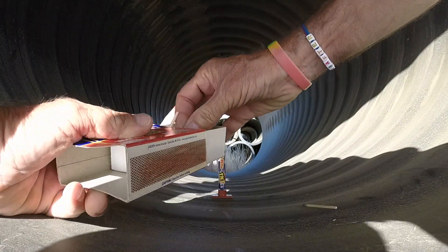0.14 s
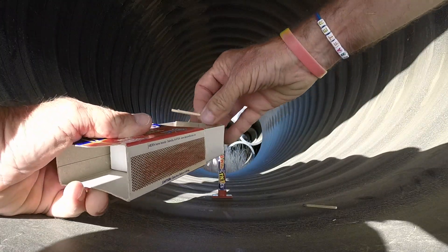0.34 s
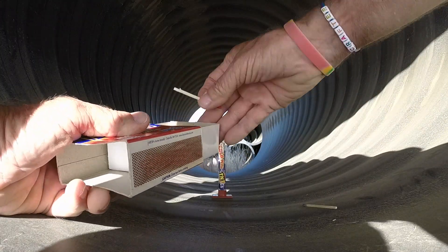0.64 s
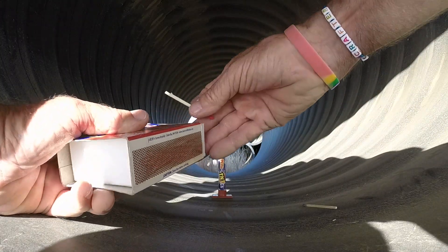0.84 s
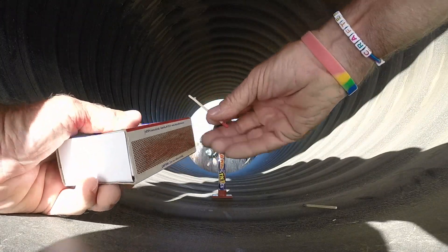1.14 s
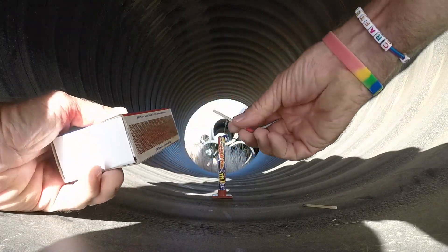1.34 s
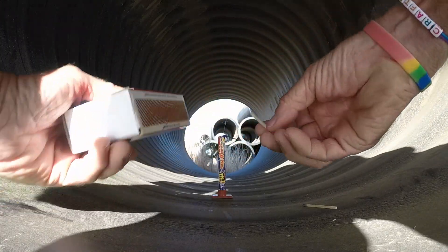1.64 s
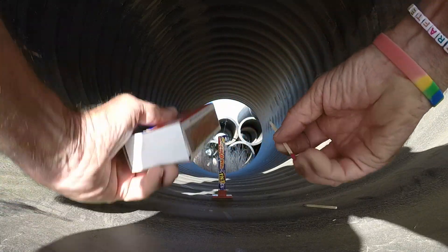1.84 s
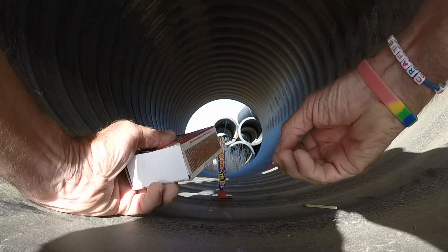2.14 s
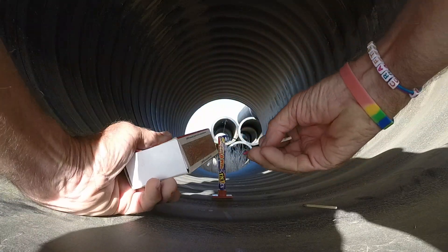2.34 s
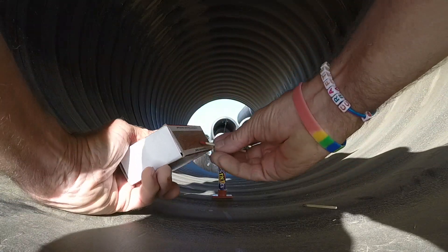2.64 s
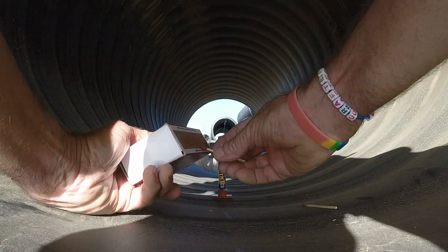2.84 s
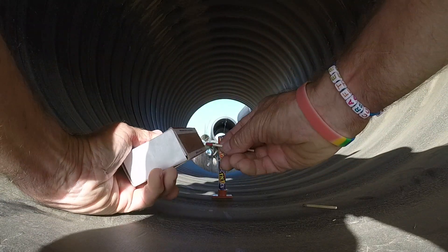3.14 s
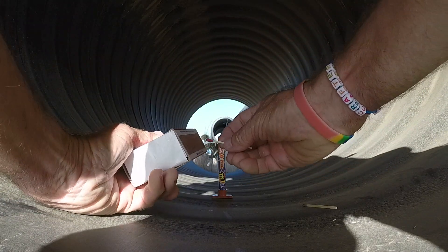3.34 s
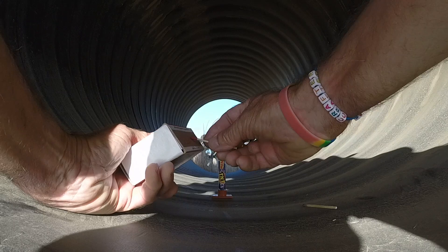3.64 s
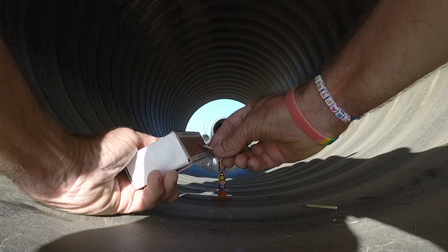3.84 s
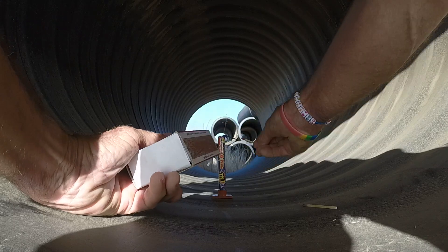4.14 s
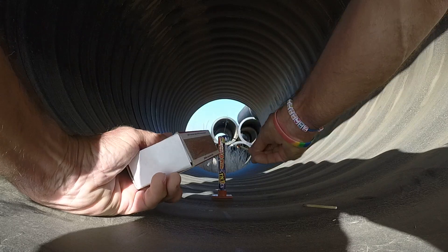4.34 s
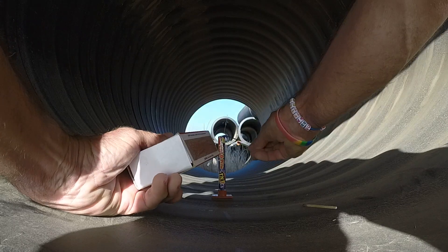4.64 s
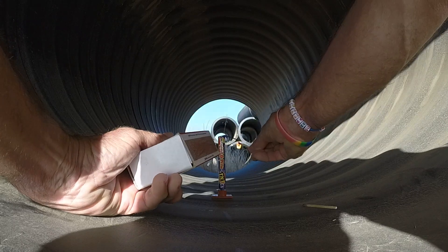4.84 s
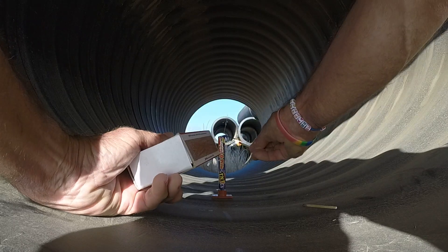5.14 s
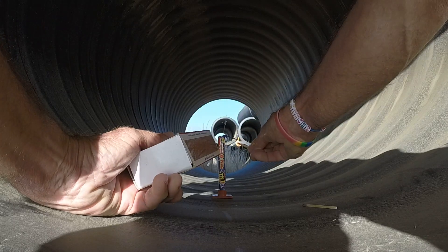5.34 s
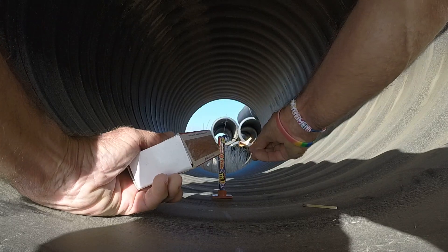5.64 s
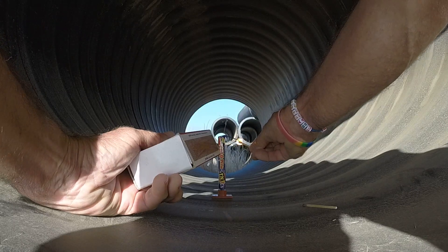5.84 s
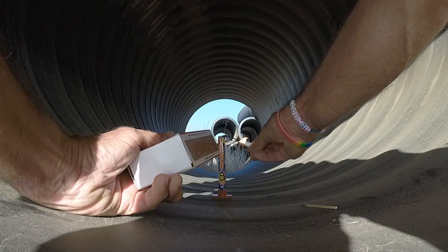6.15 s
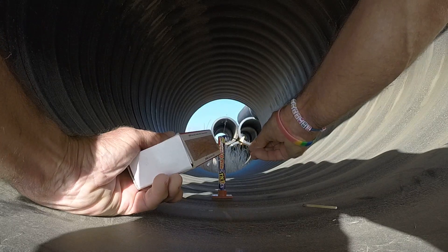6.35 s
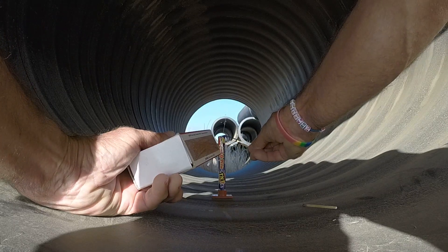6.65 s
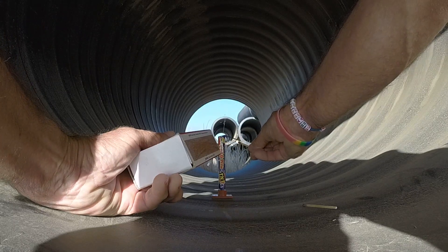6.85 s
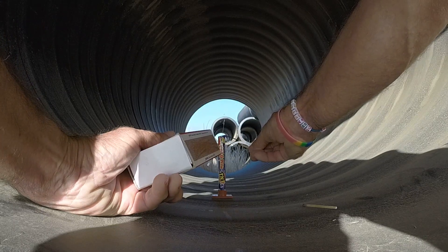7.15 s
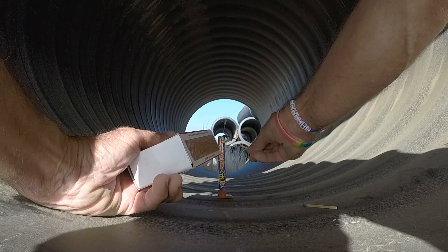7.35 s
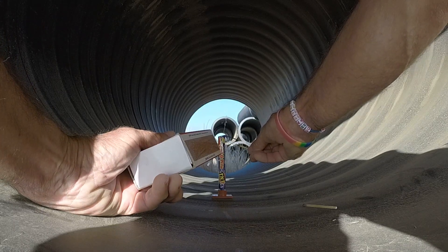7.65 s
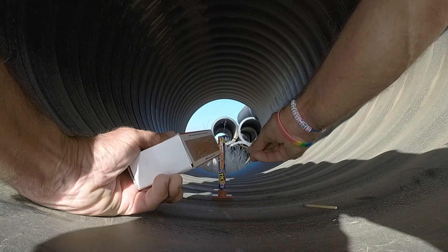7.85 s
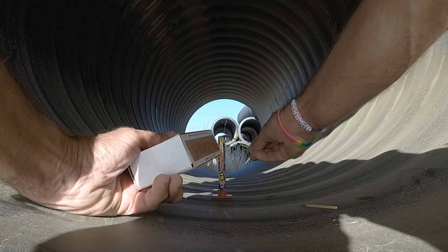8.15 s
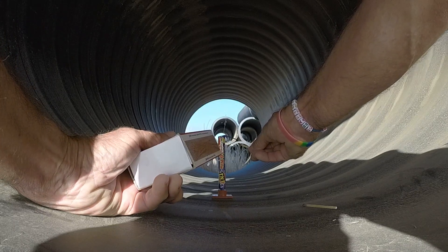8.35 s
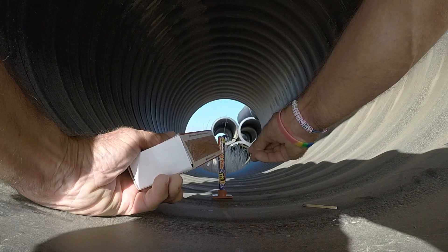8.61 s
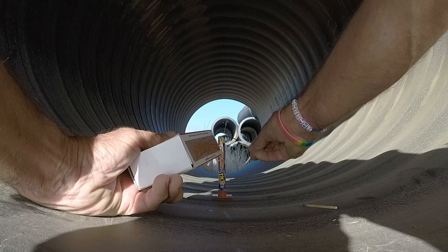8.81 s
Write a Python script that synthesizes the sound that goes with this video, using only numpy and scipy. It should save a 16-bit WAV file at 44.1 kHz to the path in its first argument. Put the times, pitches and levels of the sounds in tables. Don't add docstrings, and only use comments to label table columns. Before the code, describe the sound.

Close matchbox rattling and a gritty tray slide, two heavy thuds on a plastic pipe wall, a brief match scrape and sputter, then faint breeze.

```python
import sys
import numpy as np
from scipy import signal
from scipy.fft import rfft, irfft, next_fast_len
from scipy.io import wavfile
from scipy.ndimage import uniform_filter1d, map_coordinates

SR = 44100
rng = np.random.default_rng(int(sys.argv[2]) if len(sys.argv) > 2 else 0)


def to_linear_factor(level_db):
    exponent = np.asarray(level_db, float) / 20
    return 10 ** exponent


def wrap_up_sound(samples):
    columns = np.atleast_2d(samples).T
    tamed = np.clip(columns, -1, 1)
    steps = np.round(tamed * 32767).astype(np.int16)
    wavfile.write(sys.argv[1], SR, steps)


N = 396018
TIME = np.arange(N) / SR

# (peak time [s], rise [s], fall [s], body level [dB], grit over body [dB])
RUMMAGE = [
    (0.0, .002, 0.34, -52.5, -14),
    (0.463, .002, 0.25, -52, -14),
]
# (peak time [s], rise [s], fall [s], body level [dB], grit over body [dB])
TRAY = [
    (.757, .01, .1, -61, -15),
    (.83, 0.1, 0.17, -45.5, -0.5),
    (.885, 0.21, 0.12, -54, 7.5),
    (.926, .02, 0.064, -50, -11),
    (1.012, 0.037, 0.11, -56.5, 9.5),
    (1.046, 0.067, 0.073, -48, -4),
]
# (peak time [s], rise [s], fall [s], body level [dB], grit over body [dB])
DRAG = [
    (1.975, .08, 0.18, -67, 6),
    (2.009, 0.024, 0.087, -55.5, 16),
    (2.04, .05, 0.24, -50, 7),
    (2.123, 0.18, 0.15, -44.5, 3),
    (2.343, .03, .3, -65, -7),
]
# (peak time [s], rise [s], fall [s], body level [dB], grit over body [dB])
FUMBLE = [
    (2.83, .04, 0.25, -66, -4),
    (2.92, .03, .15, -72, 7),
    (2.96, .05, .1, -70, 5),
    (3.01, .03, .12, -60.5, -2),
    (3.1, .02, .06, -66, -5),
]
# (peak time [s], rise [s], fall [s], body level [dB], grit over body [dB])
SCRAPE = [
    (3.99, .006, .05, -54, -10),
    (4.002, .006, 0.097, -45.5, 1.5),
    (4.015, .01, .05, -41, 2),
    (4.029, .02, .018, -39, 2.5),
    (4.04, .008, 0.012, -42.5, 2),
]
# (peak time [s], rise [s], fall [s], body level [dB], grit over body [dB])
PUFFS = [
    (4.051, .005, .04, -48, -1),
    (4.084, .1, .11, -45.5, -3.5),
    (4.107, .004, .02, -50, -1),
    (4.178, 0.14, .1, -56, -3.5),
    (4.214, .03, 0.086, -62, -8),
]

# (frequency [Hz], level [dB per Hz])
STICKS_COLOUR = [(800, -31), (1200, 3), (1800, -5), (3000, -13.5), (6000, -8), (8000, -11), (13000, -40)]
# (frequency [Hz], level [dB per Hz])
CARD_COLOUR = [(500, -25), (900, -6), (1400, -3), (2500, -12.5), (4200, -18.5), (6000, -12), (9000, -22),
               (15400, -33.5)]
# (frequency [Hz], level [dB per Hz])
SKIN_COLOUR = [(500, -25), (1000, -0.5), (1700, 2.5), (3200, -13.5), (4300, -19), (6000, -15.5),
               (8500, -31), (14000, -43.5)]
# (frequency [Hz], level [dB per Hz])
HEAD_COLOUR = [(300, -30), (700, -5), (1500, -6.5), (3300, -7.5), (4300, -11.5), (6500, -13), (11000, -17),
               (15400, -27)]
# (frequency [Hz], level [dB per Hz])
FUMBLE_COLOUR = [(1200, -28), (2000, 3), (3000, 1), (4300, -18), (6000, -7), (8000, -22), (13000, -39)]
# (frequency [Hz], level [dB per Hz])
FLARE_COLOUR = [(300, -22), (700, -12.5), (1500, -4), (3000, -10), (4300, -16), (6000, -14), (9000, -24),
                (15400, -42)]

# (frequency [Hz], width [Hz], lift [dB])
RIBS = [(2300, 83, 10.5), (2900, 82, 14.5), (3600, 73, 5), (5000, 100, 9), (5900, 340, 6.5)]
# (frequency [Hz], width [Hz], lift [dB])
BOX = [(1600, 220, 6.5), (2290, 150, 4), (3600, 350, 7), (5000, 250, 3), (5840, 340, 2.5), (6700, 300, 2.5)]
# (frequency [Hz], width [Hz], lift [dB])
GROOVES = [(1400, 120, 6.5), (1740, 130, 4.5), (2300, 210, 12), (2820, 220, 4.5), (3710, 100, 11.5),
           (5140, 300, 9.5), (5870, 510, 3.5)]
# (frequency [Hz], width [Hz], lift [dB])
STRIP = [(2310, 98, 4), (2920, 110, 5.5), (3720, 150, 10.5), (4970, 140, 14), (5750, 300, 8),
         (7320, 300, 3), (12100, 300, 4)]
# (frequency [Hz], width [Hz], lift [dB])
PIPE_AT_MATCH = [(2330, 220, 6.5), (3650, 300, 9.5), (5000, 250, 10), (5850, 350, 5.5)]
# (time [s], level [dB], frequency [Hz], time to fall 60 dB [s])
BOX_HUM = (4, -44.5, 331.5, .5)

# (time [s], peak level [dB], brightness [dB], ring [Hz])
BOX_TICKS = [(0.0116, -45, -11, 1560), (0.181, -43, -20, 1470), (0.5274, -37, -12, 1340),
             (0.753, -40, -25, 1545), (0.8372, -37.5, -7, 1600), (0.9363, -40, -22, 1600),
             (1.044, -36, -10, 1470), (1.6542, -43.5, -26, 1790)]
# (time [s], peak level [dB], brightness [dB], ring [Hz])
RIB_TICKS = [(0.9278, -30, -16, 2260), (1.052, -30.5, -32, 2050), (1.4416, -48, -10, 2270),
             (2.0052, -33, -3, 2280), (2.1016, -33, -10, 2330), (2.133, -26, -20, 2290),
             (3.0005, -40, -19, 2330), (3.0175, -39, -16, 2260), (3.0964, -41, -16, 2230),
             (4.0271, -31, -1, 2330), (4.172, -38, -16, 2280), (4.1864, -45, -20, 2230),
             (4.2906, -45, -12, 2300), (4.303, -46, -30, 2300)]
# (time [s], peak level [dB], brightness [dB], ring [Hz])
SNAPS = [
    (0.4588, -28, -8, 2250),
    (2.2094, -47, -5, 2290),
    (2.8617, -46, -19, 2230),
    (2.919, -51, -14, 1950),
    (3.059, -53, -2, 2500),
    (3.992, -37, -10, 2940),
]
# (time [s], peak level [dB], brightness [dB], ring [Hz])
SPECKS = [
    (0.0474, -55, 3, 1290),
    (1.838, -53, 3, 1490),
]
# (time [s], peak level [dB], brightness [dB], ring [Hz])
CRACKS = [
    (1.8113, -26, -40, 2330),
    (1.989, -19, -34, 2020),
]

# (delay [s], level [dB])
FLUTTER = [(0.0104, -8.5), (0.0233, -14), (.0325, -16), (.045, -26)]
# (time [s], peak level [dB], frequency [Hz], boom level [dB], shake level [dB])
THUMPS = [
    (1.818, -7, 262, -40, -51),
    (1.997, -6, 254, -30, -28.5),
]
# (delay [s], level [dB])
THUMP_ECHOES = [
    [(.011, -7.5), (.0187, -12.5)],
    [(.0105, -14), (.0145, -13.5)],
]
# (time [s], peak level [dB])
FORERUNNERS = [
    (1.8142, -24),
    (1.9932, -36.5),
]
# (frequency [Hz], first blow level [dB], second blow level [dB], time to fall 60 dB [s])
WALL = [(171.5, -18, -45, 0.2), (204, -15.5, -17, 0.22), (274.3, -14, -20.5, 0.2),
        (356.5, -16.5, -16, 0.15), (422, -22, -31, 0.097), (552, -25.5, -30, 0.08),
        (700, -22, -18.5, 0.082)]
# (time [s], peak level [dB], frequency [Hz])
NUDGES = [(0.84, -48.5, 295), (1.576, -37.5, 228), (1.621, -47, 266), (1.91, -38, 215), (2.073, -27.5, 212),
          (2.128, -35.5, 204), (2.247, -37.5, 240), (2.299, -54, 198), (4.004, -38.5, 220),
          (4.048, -44, 246), (4.209, -63, 143)]
# (time [s], peak level [dB], frequency [Hz], spread [s])
JOLTS = [
    (1.822, -43, 60, 0.0083),
    (2.01, -22.5, 50, 0.0092),
    (4.05, -47, 69, 0.019),
    (4.47, -48.5, 60.4, 0.011),
]

# (time [s], level [dB])
BREEZE = [(0.0, -65), (0.25, -54), (0.63, -57), (1.07, -64.5), (1.9, -55), (2.15, -45), (2.5, -51),
          (2.95, -60.5), (3.6, -63.5), (4.15, -56), (4.68, -64), (5.03, -68), (5.43, -62), (6.2, -61.5),
          (6.73, -56), (7.45, -65), (8.1, -59.5), (8.98, -63)]
# (frequency [Hz], level [dB per Hz])
BUFFET_COLOUR = [(10, -24.5), (20, -6.5), (30, -1.5), (42, -7.5), (60, -25), (120, -71)]
# (peak time [s], rise [s], fall [s], level [dB])
RUMBLES = [
    (1.86, 0.33, .3, -59),
    (2.03, 0.14, 0.38, -44),
    (4.15, .4, 0.37, -59),
]
# (frequency [Hz], level [dB per Hz])
MURMUR_COLOUR = [(32, -33), (55, 2), (75, 0.5), (220, -3), (390, -9.5), (950, -18), (2070, -19)]
# (frequency [Hz], level [dB per Hz])
HISS_COLOUR = [(390, -11), (950, -14.5), (3000, -20), (5080, -25), (8000, -31), (11100, -36.5),
               (13000, -35.5), (15400, -37)]
# (frequency [Hz], width [Hz], lift [dB])
SELF_TONES = [(10040, 230, 3.5), (11840, 430, 3)]
# (frequency [Hz], chance [0-1])
TREBLE_GAPS = [(12600, 0), (13000, .3), (14200, .45), (14950, .6), (15100, .97)]


def unit(x):
    return x / np.sqrt(np.mean(x ** 2) + 1e-20)


def along(points, hz):
    f, v = np.transpose(points)
    return np.interp(np.log(hz + 1), np.log(f + 1), v)


def wobble(rate):
    return map_coordinates(rng.standard_normal(int(N * rate / SR) + 4), [TIME * rate])


def filtered(x, response):
    m = next_fast_len(N + SR // 2)
    return irfft(rfft(x, m) * response(np.fft.rfftfreq(m, 1 / SR)), m)[..., :N]


def lifted(modes, f):
    peaks = [1 + (to_linear_factor(db) - 1) * 1j * f * w / (c * c - f * f + 1j * f * w) for c, w, db in modes]
    return np.prod(peaks, axis=0)


def band(f, low_hz, high_hz):
    return (1j * f / low_hz / (1 + 1j * f / low_hz)) ** 2 / (1 + 1j * f / high_hz) ** 2


def echoes(x, returns):
    return filtered(x, lambda f: 1 + sum(to_linear_factor(db) * np.exp(-2j * np.pi * f * s) for s, db in returns))


def effort(s, rise, fall):
    distance = np.where(TIME < s, (s - TIME) / rise, (TIME - s) / fall)
    return np.maximum(-20 * distance, -120)


def push(s, hz, spread):
    out, near = np.zeros(N), abs(TIME - s) < 5 * spread
    t = TIME[near] - s
    out[near] = -np.cos(2 * np.pi * hz * t) * np.exp(-.5 * (t / spread) ** 2)
    return out


def ring(s, hz, t60, attack):
    out, live = np.zeros(N), (TIME > s) & (TIME < s + t60)
    t = TIME[live] - s
    out[live] = np.sin(2 * np.pi * hz * t) * to_linear_factor(-60 * t / t60) * (1 - np.exp(-t / attack))
    return out


def handling():
    sticks = rub(RUMMAGE, STICKS_COLOUR, RIBS, grain_db=1.0, lump_db=1.5, grit_grows=1.1)
    fumble = rub(FUMBLE, FUMBLE_COLOUR, PIPE_AT_MATCH, grain_db=1.0, lump_db=2.5, grit_grows=1.2)
    tray = rub(TRAY, CARD_COLOUR, BOX + BOX, grain_db=0.0, lump_db=1.5, grit_grows=1.7)
    drag = rub(DRAG, SKIN_COLOUR, GROOVES, grain_db=3.0, lump_db=2.0, grit_grows=1.5)
    return sticks + fumble + tray + drag + match_strike()


def match_strike():
    scrape = rub(SCRAPE, HEAD_COLOUR, STRIP, grain_db=3.0, lump_db=-0.3, grit_grows=1.53)
    flare = rub(PUFFS, FLARE_COLOUR, PIPE_AT_MATCH, grain_db=1, lump_db=1.5, grit_grows=1.64)
    s, db, hz, t60 = BOX_HUM
    hum = to_linear_factor(db + 3.5 * wobble(25)) * ring(s, hz, t60, attack=0.036)
    return scrape + flare + hum


def rub(strokes, spectrum, modes, grain_db, lump_db, grit_grows):
    grains = rng.standard_normal(N) * to_linear_factor(grain_db * wobble(900) + lump_db * wobble(70))
    colour = lambda f: to_linear_factor(along(spectrum, f)) * lifted(modes, f)
    low = lambda f: 1 / (1 + (f / 3000) ** 8)
    body = unit(filtered(grains, lambda f: colour(f) * np.sqrt(low(f))))
    grit = unit(filtered(grains, lambda f: colour(f) * np.sqrt(1 - low(f))))
    body_power, grit_power = np.zeros(N), np.zeros(N)
    for s, rise, fall, db, grit_db in strokes:
        stroke = effort(s, rise, fall)
        body_power += to_linear_factor(db + stroke) ** 2
        grit_power += to_linear_factor(db + grit_db + grit_grows * stroke) ** 2
    return np.sqrt(body_power) * body + np.sqrt(grit_power) * grit


def contacts():
    taps = ticks([(BOX_TICKS, 3000, -10), (RIB_TICKS, 3700, -14), (SNAPS, 4500, -8), (SPECKS, 7300, -10)])
    cracks = ticks([(CRACKS, 1400, -10)])
    return echoes(taps, FLUTTER) + filtered(cracks, lambda f: 1 / (1 + (f / 2800) ** 8))


def ticks(groups):
    tone, dull, bright = np.zeros((3, N + SR))
    t = np.arange(800) / SR
    shape = lambda rise: (t / rise * np.exp(1 - t / rise)) ** 1.55
    for table, chink_hz, crackle_db in groups:
        for s, db, bright_db, hz in table:
            noise = rng.standard_normal((2, len(t)))
            start = round(s * SR) - 30
            at = slice(start, start + len(t))
            tone[at] += to_linear_factor(db - 6.5) * shape(0.0021) * np.sin(2 * np.pi * hz * t)
            tone[at] += to_linear_factor(db + bright_db - 6.5) * shape(0.0022) * np.sin(2 * np.pi * chink_hz * t)
            dull[at] += to_linear_factor(db + crackle_db) * shape(0.0029) * noise[0]
            bright[at] += to_linear_factor(db + bright_db) * shape(0.0012) * noise[1]
    dull = to_linear_factor(39.5) * filtered(dull[:N], lambda f: band(f, 973, 2510) ** 5)
    bright = to_linear_factor(44.0) * filtered(bright[:N], lambda f: band(f, 4260, 6650) ** 5 * lifted(RIBS[3:], f))
    return tone[:N] + dull + bright


def thumps():
    out = sum(to_linear_factor(db) * push(s, 644, spread=0.0017) for s, db in FORERUNNERS)
    for k, (s, db, hz, boom_db, shake_db) in enumerate(THUMPS):
        out += to_linear_factor(db) * echoes(push(s, hz, spread=0.0022), THUMP_ECHOES[k])
        for wall_hz, *levels_db, t60 in WALL:
            out += to_linear_factor(db + levels_db[k]) * ring(s - .004, wall_hz, t60, attack=0.0061)
        out += to_linear_factor(boom_db + 1.3 * wobble(8)) * ring(s, 67.8, 1.46, attack=0.027)
        shake = ring(s, 34, 0.57, attack=0.006) + 0.38 * ring(s, 95, 0.39, attack=0.006)
        out += to_linear_factor(shake_db + 3.7 * wobble(12.35)) * shake
    return out


def nudges():
    return echoes(sum(to_linear_factor(db) * push(s + 0.005, hz, spread=0.0035) for s, db, hz in NUDGES), FLUTTER)


def rocking():
    return sum(to_linear_factor(db) * push(s, hz, spread) for s, db, hz, spread in JOLTS)


def air():
    buffet = to_linear_factor(np.interp(TIME, *np.transpose(BREEZE)) + 0.92 * 20 * np.log10(to_linear_factor(1)) * wobble(2.5))
    rumble = unit(filtered(rng.standard_normal(N), lambda f: to_linear_factor(along(BUFFET_COLOUR, f))))
    rumbles_power = sum(to_linear_factor(db + effort(*when)) ** 2 for *when, db in RUMBLES)
    murmur = np.sqrt(to_linear_factor(-59) ** 2 + rumbles_power)
    z = signal.stft(rng.standard_normal(N), nperseg=512)[2]
    field = uniform_filter1d(rng.standard_normal(z.shape), size=8, axis=0)
    field = uniform_filter1d(field, size=24, axis=1)
    patchy = signal.istft(z * to_linear_factor(0.46 * unit(field)), nperseg=512)[1][:N]
    low = lambda f: 1 / (1 + (f / 600) ** 4)
    deep = unit(filtered(patchy, lambda f: to_linear_factor(along(MURMUR_COLOUR, f)) * np.sqrt(low(f))))
    hiss_colour = lambda f: to_linear_factor(along(HISS_COLOUR, f)) * lifted(SELF_TONES, f)
    hiss = unit(filtered(patchy, lambda f: hiss_colour(f) * np.sqrt(1 - low(f))))
    return buffet * rumble + murmur * deep + to_linear_factor(-62.5) * hiss


def whine():
    out = np.zeros(N)
    for k, (size, turn) in enumerate(rng.standard_normal((8, 2)), 7):
        out += to_linear_factor(-102 + 3 * size) * np.sin(2 * np.pi * (k * 1000 * TIME + turn))
    return out


def scene():
    return (handling() + contacts() + thumps() + nudges() + rocking() + air() + whine())[None]


def roll_off(x):
    return signal.sosfilt(signal.butter(12, 15530, fs=SR, output="sos"), x)


def record(dry):
    hz, _, z = signal.stft(filtered(dry, lambda f: f < 15350), SR, nperseg=2048)
    dice = np.repeat(rng.random((172, z.shape[-1])), 6, axis=0)[:len(hz)]
    top = abs(z[0, hz > 12000]).mean(axis=0)
    faint = top < 1.6 * np.median(top)
    lost = (dice < along(TREBLE_GAPS, hz)[:, None]) & faint
    mix = signal.istft(z * ~lost, SR, nperseg=2048)[1][:, :N]
    return roll_off(mix)


dry = scene()
out = record(dry)
wrap_up_sound(out)
```